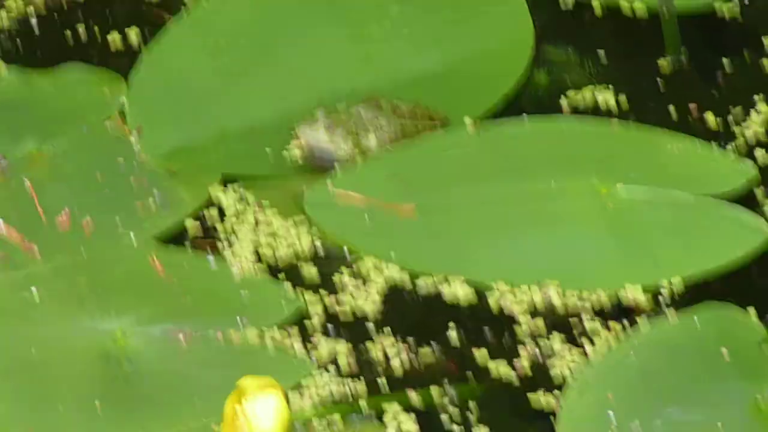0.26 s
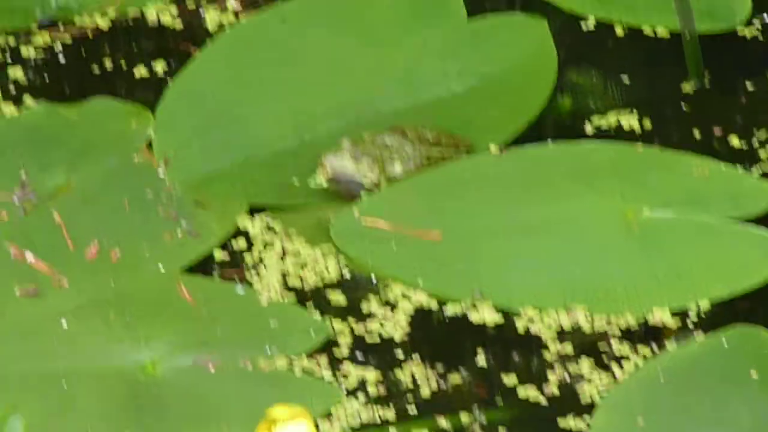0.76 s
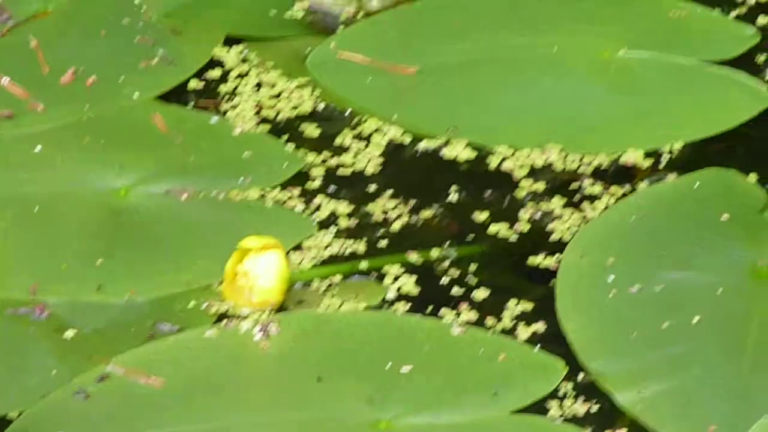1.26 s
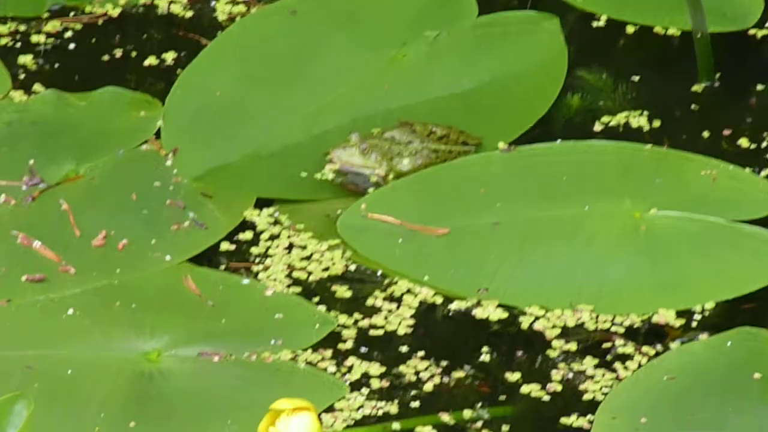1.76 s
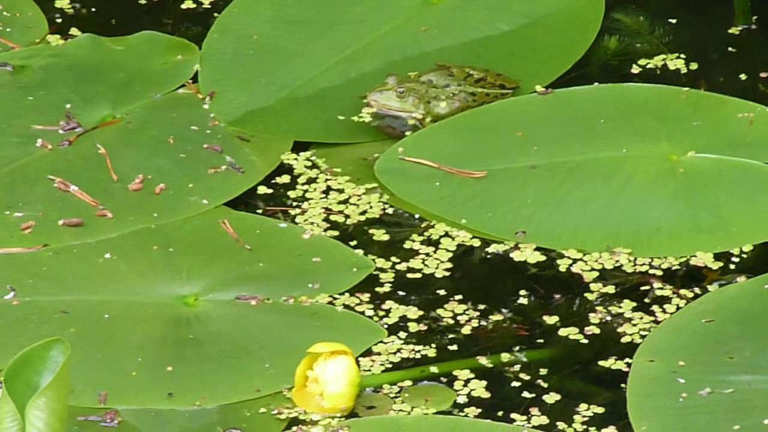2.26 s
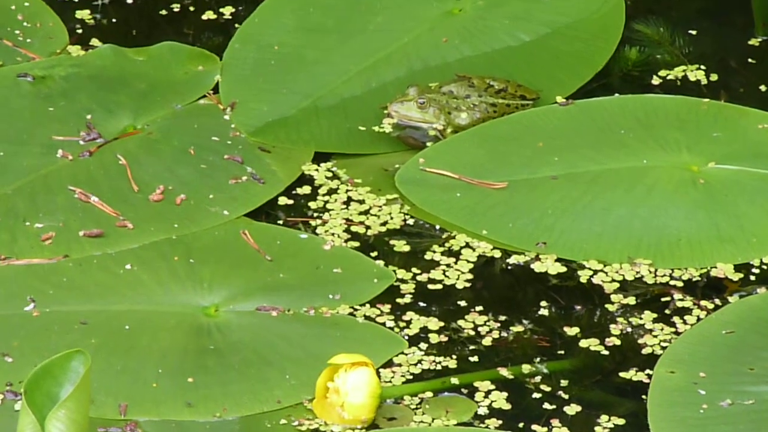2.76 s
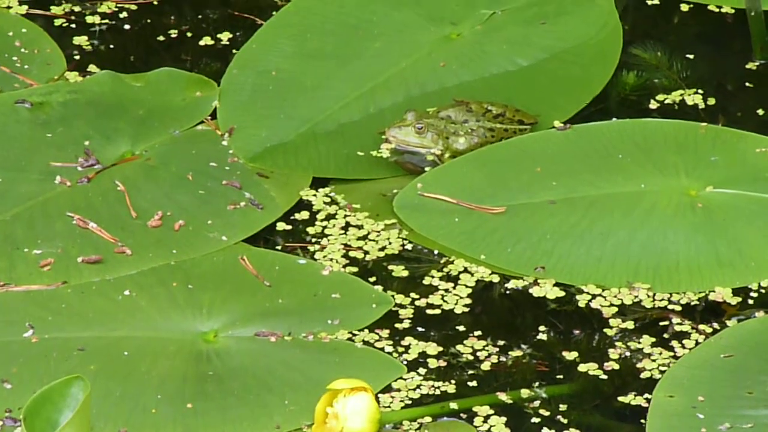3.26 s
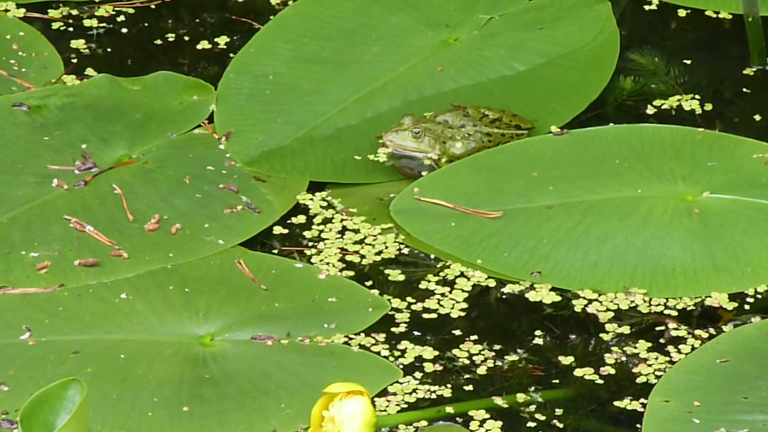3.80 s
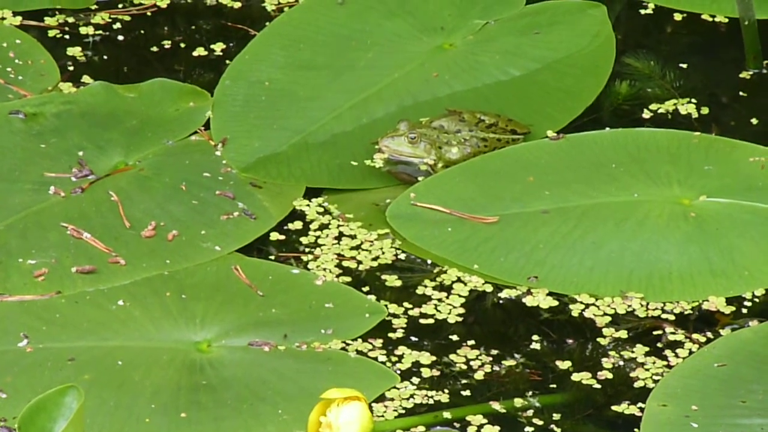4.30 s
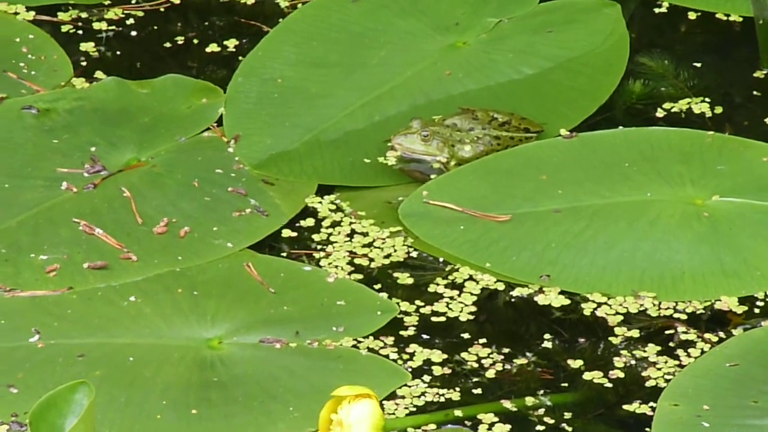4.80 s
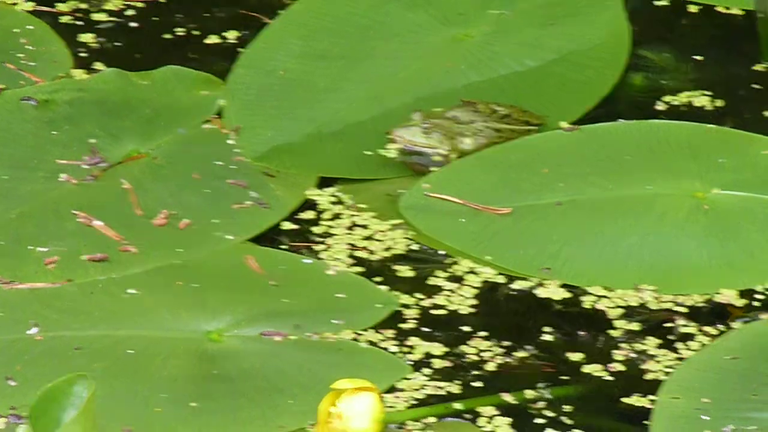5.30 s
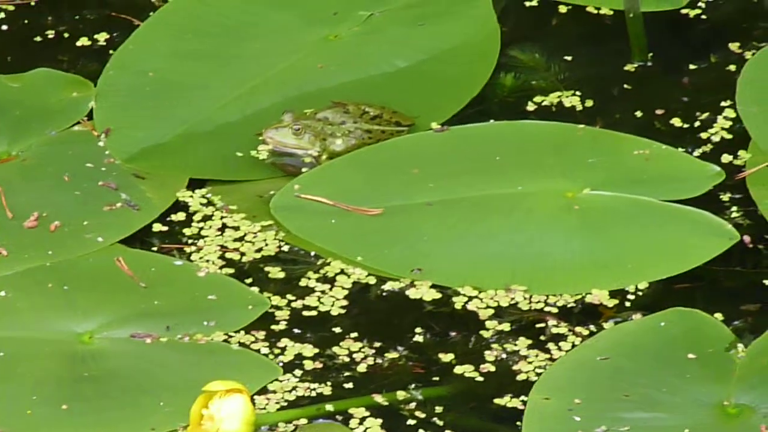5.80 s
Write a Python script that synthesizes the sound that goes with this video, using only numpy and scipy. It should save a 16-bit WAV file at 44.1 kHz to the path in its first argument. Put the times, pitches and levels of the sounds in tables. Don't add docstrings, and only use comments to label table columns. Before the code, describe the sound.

Sharp plastic clicks from a handled camera, then small birds chirp, whistle and warble over a steady low hum in a garden pond setting.

```python
import sys
import numpy as np
from scipy import signal
from scipy.fft import rfft, irfft, next_fast_len
from scipy.io import wavfile
from scipy.ndimage import uniform_filter1d

SR = 44100
rng = np.random.default_rng(int(sys.argv[2]) if len(sys.argv) > 2 else 0)


def generate_wav(signal):
    frames = np.transpose(np.atleast_2d(signal))
    scaled = np.clip(frames, -1, 1) * 32767
    pcm = np.round(scaled).astype(np.int16)
    wavfile.write(sys.argv[1], SR, pcm)


def natural_amplitude(level_db):
    exponent = np.asarray(level_db, float) / 20
    return 10 ** exponent


N = 266805
TOP_HZ = 7800


def evened(x):
    return x / np.sqrt(np.mean(x ** 2) + 1e-20)


def read(points, hz):
    f, value = np.transpose(points)
    return np.interp(np.log(hz + 1), np.log(f + 1), value)


def add(mix, s, sound):
    part = mix[round(s * SR):][:len(sound)]
    part += sound[:len(part)]


def wander(count, rate_hz):
    wide = max(int(SR / rate_hz / 2), 2)
    once = uniform_filter1d(rng.standard_normal(count), wide)
    return uniform_filter1d(once, wide) * np.sqrt(1.51 * wide)


def hum(patchy_db, swell_db):
    # hz, level_db per Hz
    traffic = [(25, -18.5), (45, -4), (130, -3.5), (400, -3), (800, -6), (1500, -11), (2500, -13.5),
               (3500, -14.5), (4500, -16.5), (5500, -20), (8000, -20.5)]
    # time_s, level_db
    traffic_level = [(0.0, -48.5), (1.01, -52), (6.05, -49)]
    # pitch_hz, width_hz, level_db
    drones = [(78.1, 8.8, -59.5), (195, 11.84, -61)]
    # time_s, level_db
    motor = [(0, -62), (1.1, -63), (1.4, -59), (1.8, -63), (2.2, -58), (2.6, -63), (3.0, -57), (3.45, -55),
             (3.6, -62), (6.05, -61)]
    frames, hz = N // 256 + 9, np.fft.rfftfreq(2048, 1 / SR)
    a, b, patches = rng.standard_normal((frames, len(hz), 3)).T
    patches = evened(uniform_filter1d(uniform_filter1d(patches, 20, 0), 12, 1))
    swell = evened(uniform_filter1d(rng.standard_normal(frames), 16))
    z = (a + 1j * b) * natural_amplitude(read(traffic, hz)[:, None] + patchy_db * patches + swell_db * swell)
    wide = evened(signal.istft(z, nperseg=2048, noverlap=1792)[1][:N])
    t = np.arange(N) / SR
    out = natural_amplitude(np.interp(t, *np.transpose(traffic_level)) + 2.99) * wide
    load_db = np.interp(t, *np.transpose(motor))
    for (drone_hz, width_hz, drone_db), load in zip(drones, (0, load_db - load_db.mean())):
        turns = np.cumsum(drone_hz + 0.253 * width_hz * wander(N, 6.0)) / SR
        out += natural_amplitude(drone_db + load + 0.5 + 3.2 * wander(N, 26)) * np.sin(2 * np.pi * turns)
    return out


def curves(start, length):
    t = np.arange(-.003, length + 0.0058, 1 / SR)
    edge = np.clip(np.minimum(t - t[0], t[-1] - t) / 0.004, 0, 1)
    return start + t[0], np.sin(np.pi / 2 * edge) ** 2, np.clip(t / length, 0, 1)


def glide(u, length, from_hz, to_hz):
    return from_hz + (to_hz - from_hz) * u


def sink(u, length, sink_s, rest_hz):
    return rest_hz + (TOP_HZ - rest_hz) * np.exp(-u * length / sink_s)


def slide(u, length, knee_hz, end_hz):
    return knee_hz + (end_hz - knee_hz) * u + (TOP_HZ - knee_hz) * np.exp(-u * length / .008)


def settle(u, length, from_hz, to_hz):
    return to_hz + (from_hz - to_hz) * (1 - u) ** 8


def turn_back(u, length, ends_hz, top_hz):
    return ends_hz + (top_hz - ends_hz) * np.sin(np.pi * u)


def whistles(notes, law, swell_db, fade_db, flutter_db, flutter_hz, waver, trill_hz=0.):
    out = np.zeros(N)
    for s, length, a, b, level_db in notes:
        start, edge, u = curves(s, length)
        hz = law(u, length, a, b)
        db = level_db - swell_db * (2 * u - 1) ** 2 - fade_db * (u - .5)
        db = db + flutter_db * wander(len(hz), flutter_hz)
        shake = np.sin(2 * np.pi * np.cumsum(80 * (1 + .3 * wander(len(hz), 30))) / SR)
        turns = np.cumsum(hz * (1 + waver * wander(len(hz), 150)) + trill_hz * shake) / SR
        grain = 1 + .35 * wander(len(hz), 500)
        add(out, max(start, 0), np.sqrt(2) * edge * natural_amplitude(db) * grain * np.sin(2 * np.pi * turns))
    return out


def garden(x, stretch):
    # hz, t60_s
    echo_decay = [(1500, .5), (3500, .4), (7000, .25)]
    taps = np.zeros(SR // 2)
    at = np.arange(130, len(taps) - 20, 20)
    taps[at + rng.integers(0, 20, len(at))] = rng.choice([-1., 1.], len(at))
    hz, t, z = signal.stft(taps, SR, nperseg=256)
    t60 = stretch * read(echo_decay, hz)[:, None]
    tail = signal.istft(z * natural_amplitude(-60 * t / t60), SR, nperseg=256)[1]
    share, speed_hz = .35, 200
    flecks = (1 + share * wander(N, speed_hz)) / np.hypot(1, share)
    return flecks * signal.fftconvolve(x, tail / np.linalg.norm(tail))[:N]


def far_birds():
    # start_s, length_s, from_hz, to_hz,
    # level_db
    thin_notes = [(.003, .038, 3800, 4150, -58), (.045, .025, 4250, 4900, -59), (.14, .06, 6320, 6300, -65),
                  (.06, .06, 4700, 4750, -72), (1.815, 0.12, 5940, 5780, -72), (2.06, .05, 5850, 5650, -68),
                  (2.46, 0.085, 3400, 3350, -61.5), (2.708, 0.02, 4400, 4300, -59),
                  (2.843, 0.009, 4300, 4500, -51), (2.2, .01, 4600, 4450, -57), (2.682, .006, 5700, 5650, -60),
                  (3.695, 0.12, 4960, 5100, -65), (3.82, .065, 3460, 3270, -68), (4.02, 0.11, 3700, 3740, -62.5),
                  (4.22, 0.02, 4425, 4575, -62), (4.335, 0.032, 4460, 4400, -56.5), (4.4, .05, 4300, 4460, -62),
                  (4.688, .022, 6600, 6100, -59), (4.71, .05, 6150, 5600, -57), (4.775, .02, 5600, 5560, -58),
                  (4.7, 0.21, 5200, 4720, -64), (4.73, 0.18, 6730, 6280, -58.5), (4.69, .045, 3860, 3734, -58.5),
                  (4.545, .015, 5700, 5000, -59), (3.278, 0.03, 4750, 4900, -55), (4.882, .016, 4450, 4400, -54),
                  (4.99, 0.1, 3290, 3300, -62), (5.01, .11, 5330, 4970, -65), (5.01, 0.16, 6880, 6300, -65),
                  (5.291, .028, 6200, 5450, -58), (5.328, .045, 5800, 5000, -58),
              (5.375, 0.025, 5100, 6200, -58), (5.4, 0.02, 6000, 4950, -58), (5.42, 0.014, 4900, 5400, -59),
              (5.432, .03, 4400, 3900, -58), (5.472, .04, 4000, 3780, -52), (5.642, .12, 4100, 3520, -55.5),
              (5.778, .05, 4780, 4450, -53), (5.863, 0.045, 4750, 4830, -56),
              (5.927, .025, 3950, 4000, -48), (5.958, 0.035, 3980, 3850, -59),
              (5.999, 0.043, 3500, 3660, -58)]
    far = whistles(thin_notes, glide, swell_db=1.0, fade_db=0.5, flutter_db=4, flutter_hz=70, waver=.008)
    return far + natural_amplitude(-5.5) * garden(far, .45)


def wide_buzzes():
    # start_s, length_s, from_hz, to_hz, level_db
    buzzes = [
        (.004, 0.13, 3096, 3000, -59.5),
        (2.54, 0.047, 6830, 6030, -53),
        (4.068, 0.038, 7100, 6840, -52),
        (4.36, .13, 3940, 3700, -60),
        (5.727, .02, 7240, 6600, -47),
        (5.31, .12, 6630, 6440, -58.5),
        (5.59, .18, 3500, 3410, -55),
        (5.86, 0.12, 4090, 3680, -57),
    ]
    buzz = whistles(buzzes, glide, swell_db=3, fade_db=1.0, flutter_db=5, flutter_hz=200, waver=.05, trill_hz=450)
    return natural_amplitude(-3.5) * buzz + natural_amplitude(-3) * garden(buzz, 0.75)


def trilling_bird():
    # start_s, length_s, from_hz, to_hz, level_db
    trilled = [(.185, .075, 3600, 3750, -59), (.415, .02, 4650, 5150, -52), (.44, .06, 5050, 5000, -57),
               (.55, 0.037, 4800, 5030, -56), (.69, 0.12, 4880, 4775, -61), (4.745, .03, 2310, 2220, -54),
               (4.96, 0.022, 3600, 3800, -54), (5.6, 0.064, 4370, 4520, -45.5),
               (3.575, 0.057, 2800, 2480, -51.5), (4.32, .03, 5640, 4970, -59),
               (4.32, .02, 6575, 6800, -58), (4.4, 0.12, 3470, 3350, -57.5),
               (4.545, 0.093, 1830, 1530, -52.5), (4.64, 0.091, 1580, 1900, -53.5),
               (4.77, .075, 2230, 2134, -46), (4.84, .12, 2150, 1997, -44.5),
               (4.815, 0.081, 2350, 2770, -46), (5.148, .022, 3950, 4000, -54),
               (5.161, .006, 4300, 4550, -46), (5.185, .009, 4650, 4950, -52),
               (5.198, .015, 4700, 4400, -47), (5.4, .18, 2600, 2410, -43),
               (5.58, 0.093, 2430, 3040, -47.5), (5.66, 0.079, 3110, 3047, -43.5),
               (5.5, 0.029, 3120, 3480, -44.5), (5.9, .045, 3060, 2990, -50.5)]
    trills = whistles(trilled, glide, swell_db=3.5, fade_db=4.0, flutter_db=1.4, flutter_hz=92, waver=0.01,
                      trill_hz=90)
    return natural_amplitude(-2.5) * trills + natural_amplitude(-6.0) * garden(trills, 1.0)


def casing():
    # time_s, peak_db, snap_hz, thump_db
    clicks = [(.2445, -38, 2300, -22), (.2656, -31, 3600, -25), (.2661, -28, 4900, -25),
              (.2765, -10.5, 5200, -19), (.2777, -20, 2500, -37), (.2783, -19, 2600, -35),
              (.2793, -20, 3060, -30), (.2800, -18, 3620, -25), (.2808, -20, 5800, -30),
              (.2814, -13, 3250, -32), (.2820, -17, 4100, -30), (.2825, -16, 5600, -30),
              (.2839, -20, 4300, -25), (.2844, -21, 5200, -25), (.2849, -22, 2900, -25),
              (.5314, -23, 4500, -35), (.5320, -21, 4400, -35), (.6094, -38, 3000, -30),
              (.6124, -7.5, 5190, -22), (.61279, -10, 5190, -30), (.6142, -16, 4870, -30),
              (.6155, -22, 4330, -25), (.7261, -31, 5400, -8), (.7268, -33, 3100, -15),
              (.8517, -28, 5680, -14.5), (.8522, -30, 5150, -20), (1.0906, -27, 3000, -24),
              (1.0966, -13.5, 5300, -30), (1.0988, -28, 4800, -32), (1.1005, -32, 3200, -32),
              (1.1020, -31, 2930, -32), (1.1031, -29, 5500, -34), (1.1058, -32, 4500, -30),
              (1.1090, -12, 3080, -30), (1.1097, -15, 4500, -30), (1.1106, -6, 5600, -13),
              (1.1110, -16, 5900, -30), (1.1115, -11, 3600, -23), (1.1126, -14, 5230, -32),
              (1.1132, -19, 4800, -32), (1.1141, -7, 5100, -42), (1.1148, -17, 3420, -35),
              (1.1720, -31, 3700, -12), (1.1727, -34, 2200, -12), (1.1736, -34, 5000, -15),
              (1.2377, -37, 2300, -25), (1.2405, -27, 4260, -27), (1.349, -43, 5700, -33)]
    # hz, level_db, t60_s
    shell = [(1010, -55.5, 0.011), (2150, 0, 0.022), (3000, -9.5, 0.036), (3450, 0, 0.015),
             (4550, -11, 0.03), (5200, -22, 0.012), (5800, 2, 0.013), (6300, 4, 0.011), (7350, 4, 0.012)]
    out, t = np.zeros(N), np.arange(1500) / SR
    hz, db, t60 = np.transpose(shell)[:, :, None]
    grip = 0.7
    chance = 2 * rng.random((len(clicks), 2, len(shell), 1)) - 1
    swing = t / 0.00019
    push = (1 - t / 0.00053) * np.exp(-t / 0.00032) * np.minimum(t / .0001, 1)
    for (s, peak_db, snap_hz, thump_db), (detune, spot) in zip(clicks, chance):
        snap = swing * np.exp(1 - swing) * np.sin(2 * np.pi * snap_hz * t)
        level_db = db - 3 * abs(np.log2(hz / snap_hz)) + 3 * spot - 60 * t / (t60 * grip)
        modes = (natural_amplitude(level_db) * np.sin(2 * np.pi * hz * (1 + 0.061 * detune) * t)).sum(0)
        ring = natural_amplitude(-12.5) * np.minimum(swing, 1) * modes
        add(out, s, natural_amplitude(peak_db) * (snap + ring + natural_amplitude(thump_db) * 4 * push))
    return out


def near_birds():
    # start_s, length_s, sink_s, rest_hz, level_db
    sweeps = [
        (.624, 0.075, .024, 3420, -44.5),
        (2.538, 0.08, .021, 2935, -49),
        (4.078, 0.02, .03, 2560, -45),
    ]
    # start_s, length_s, knee_hz, end_hz, level_db
    slides = [
        (2.233, .054, 6400, 3500, -43.5),
        (3.227, .046, 5500, 4450, -43),
        (5.727, .063, 5700, 3400, -43),
    ]
    # start_s, length_s, from_hz, to_hz, level_db
    dives = [
        (2.03, .015, 6800, 5030, -63),
        (2.288, 0.021, 3570, 3080, -53.5),
        (4.0, 0.049, 6140, 5200, -60),
        (3.78, .04, 6800, 3600, -62),
        (4.19, .025, 3850, 2930, -62),
        (4.428, .032, 6775, 5040, -56),
        (5.79, .022, 3340, 2950, -53),
        (4.066, .006, 5700, 7600, -52),
        (5.085, 0.046, 6630, 3370, -58),
    ]
    # start_s, length_s, from_hz, to_hz, level_db
    drops = [
        (2.125, 0.047, 5250, 3970, -57),
        (3.264, .052, 4410, 3160, -58),
        (4.118, 0.064, 4750, 3950, -60),
        (4.765, .083, 5900, 3900, -53.5),
    ]
    near = whistles(sweeps, sink, swell_db=6.5, fade_db=0.4, flutter_db=1.0, flutter_hz=80, waver=.006)
    near += whistles(slides, slide, swell_db=8.5, fade_db=-6, flutter_db=2.0, flutter_hz=80, waver=0.01)
    near += whistles(dives, glide, swell_db=4.5, fade_db=-0.5, flutter_db=3.5, flutter_hz=80, waver=.008)
    near += whistles(drops, settle, swell_db=-1.0, fade_db=5.5, flutter_db=2.0, flutter_hz=80, waver=0.006)
    return near + natural_amplitude(-6.5) * garden(near, 0.7)


def tree_singer():
    # start_s, length_s, from_hz, to_hz, level_db
    glides = [(1.76, 0.09, 3100, 3325, -58.5), (1.555, 0.03, 2100, 2075, -62),
              (3.008, 0.018, 2875, 2900, -52.5), (3.174, .026, 3500, 2550, -45.5),
              (3.2, .018, 2700, 2950, -55), (3.118, .018, 2600, 2450, -56), (3.43, 0.022, 3600, 3150, -51),
              (3.605, 0.028, 2000, 2150, -51), (3.65, 0.038, 2080, 2460, -45),
              (3.75, .018, 2050, 1970, -52), (4.235, .015, 2600, 2750, -60),
              (5.505, .07, 4510, 4470, -47.5), (4.255, 0.028, 3500, 3240, -55),
              (4.595, 0.02, 2575, 2580, -51), (4.93, 0.14, 2047, 1920, -53), (5.045, .032, 1930, 1920, -49),
              (5.088, .065, 1920, 1920, -47), (5.17, .045, 1920, 1920, -47), (5.27, 0.06, 1916, 1904, -57),
              (5.125, 0.045, 3280, 3340, -49), (4.9, .012, 3000, 3230, -50),
              (4.914, .042, 3230, 3350, -43.5), (5.245, .01, 2275, 2600, -52),
              (5.24, 0.024, 1970, 2150, -51), (5.33, 0.031, 2260, 1990, -50.5),
              (5.36, 0.024, 1990, 3200, -45.5), (5.382, .015, 3150, 2400, -48.5),
              (5.79, .012, 2000, 1900, -55), (5.73, .015, 2150, 2200, -52), (5.82, 0.022, 2150, 2900, -44)]
    # start_s, length_s, ends_hz, top_hz, level_db
    arches = [
        (1.86, .03, 2150, 3260, -54.5),
        (3.04, .045, 2900, 3290, -54),
        (4.2, 0.033, 2570, 2800, -56),
        (5.027, .043, 2316, 2690, -45.5),
        (5.72, 0.017, 2260, 2790, -46),
    ]
    song = whistles(glides, glide, swell_db=4.5, fade_db=-1.5, flutter_db=3, flutter_hz=110, waver=.008)
    song += whistles(arches, turn_back, swell_db=2.5, fade_db=-0.7, flutter_db=3, flutter_hz=110, waver=0.01)
    return song + natural_amplitude(-8.5) * garden(song, .85)


def chirps(waver):
    # start_s, length_s, low_voice_top_hz, high_voice_top_hz, level_db
    calls = [
        (2.383, .088, 2750, 3290, -45.5),
        (2.738, .085, 2400, 2860, -45.5),
        (2.897, .094, 2640, 3580, -44),
        (3.05, .095, 2770, 3400, -46),
        (3.395, .095, 2500, 2960, -44),
        (4.606, .075, 2150, 2900, -50),
    ]
    # times_low_voice, times_high_voice, level_db
    mixing = [(1, 0, -1), (0, 1, 0), (2, 0, 0), (1, 1, -2), (0, 2, -5), (3, -1, -9), (-1, 3, -9)]
    beaks = [5400, 5070, 5200, 5900, 5200, 4200]
    scoops = [.3, .11, .33, .34, .29, .2]
    lateness = [1.2, .7, 1.1, 1.0, 1.35, .75]
    plain = [-6, -4, -2, -6, -10, -9]
    rasps = [.4, .5, .65, .9, .8, .2]
    out = np.zeros(N)
    for call, beak_hz, scoop, late, plain_db, share in zip(calls, beaks, scoops, lateness, plain, rasps):
        s, length, low_top_hz, high_top_hz, top_db = call
        start, edge, u = curves(s, length)
        effort = np.sin(np.pi * u ** late)
        depth = scoop * (1 - .4 * u)
        arch = 1 - depth * (1 - effort) ** 1.3
        db = top_db - 4.5 * (1 - effort)
        low_hz = low_top_hz * arch * (1 + waver * wander(len(u), 220))
        high_hz = high_top_hz * arch * (1 + waver * wander(len(u), 220))
        tones = 0
        for low, high, tone_db in mixing:
            hz = low * low_hz + high * high_hz
            beak_db = 10 / (1 + ((hz - beak_hz) / 800) ** 2)
            rasp = share * (low + high - 1) * wander(len(hz), 400)
            open_db = plain_db if low + high == 1 else -7 * (1 - effort) ** 2
            gain = natural_amplitude(tone_db + beak_db + open_db + 2.5 * wander(len(hz), 50)) * (1 + rasp)
            tones = tones + gain * np.sin(2 * np.pi * np.cumsum(hz) / SR)
        add(out, start, edge * natural_amplitude(db) * evened(tones))
    return out + natural_amplitude(-5) * garden(out, 1.0)


def scene():
    background = hum(patchy_db=0.14, swell_db=0.4)
    birds = far_birds() + wide_buzzes() + trilling_bird()
    birds += near_birds() + tree_singer() + chirps(waver=.008)
    return (background + birds + casing())[None]


def gain_control(x):
    power_db = 10 * np.log10(abs(uniform_filter1d(x ** 2, 300)) + 1e-12)
    fall = np.arange(N) * 78.0 / SR
    over_db = np.maximum(np.maximum.accumulate(power_db + fall) - fall + 26.0, 0)
    late_db = signal.lfilter([.0015], [1, -.9985], over_db)
    return x / natural_amplitude(0.37 * late_db)


def microphone(x):
    # hz, level_db
    response = [(20, -9.5), (40, -0.24), (5000, -0.7), (6000, -4.5), (7000, -15), (7500, -28), (7720, -52),
                (7900, -64)]
    # hz, level_db
    mirror = [(8150, -30), (8350, -22), (8600, -21), (8900, -35), (9300, -70), (9600, -150)]
    size = next_fast_len(N)
    hz = np.fft.rfftfreq(size, 1 / SR)
    heard = rfft(x, size) * natural_amplitude(np.interp(hz, *np.transpose(response), right=-150))
    folded = np.round(16000 * size / SR).astype(int) - np.arange(len(hz))
    folded = np.clip(folded, 0, len(hz) - 1)
    heard += np.conj(heard[folded]) * natural_amplitude(np.interp(hz, *np.transpose(mirror), left=-150))
    return irfft(heard, size)[None, :N]


def low_pass(x):
    return signal.sosfilt(signal.butter(12, 9200, fs=SR, output="sos"), x)


def record(dry):
    mix = microphone(gain_control(dry[0])) * signal.windows.tukey(N, 400 / N)
    return low_pass(mix)


dry = scene()
out = record(dry)
generate_wav(out)
```